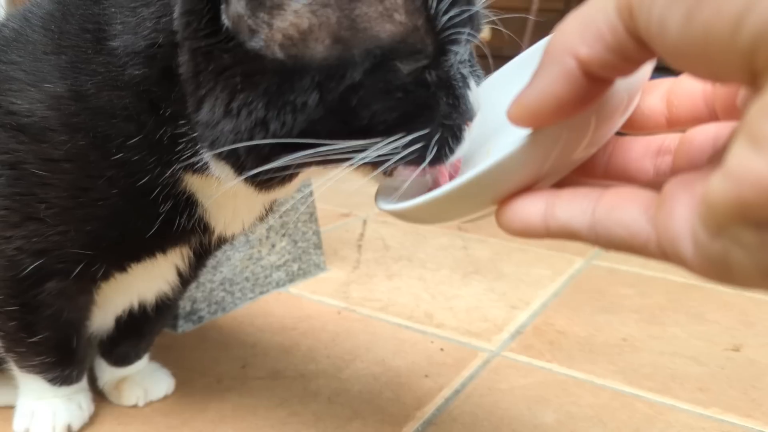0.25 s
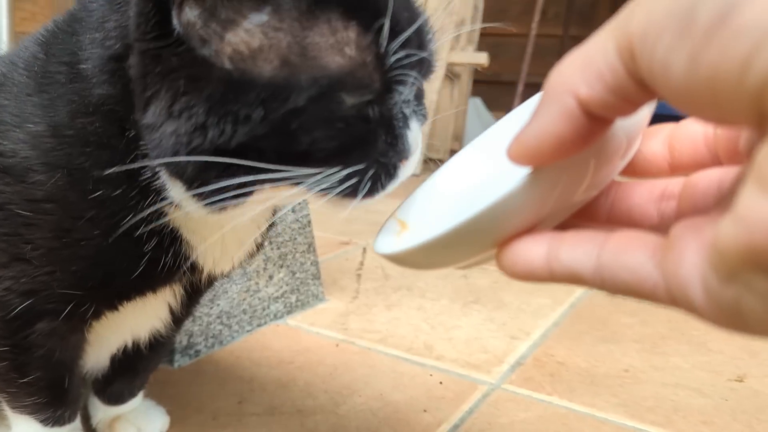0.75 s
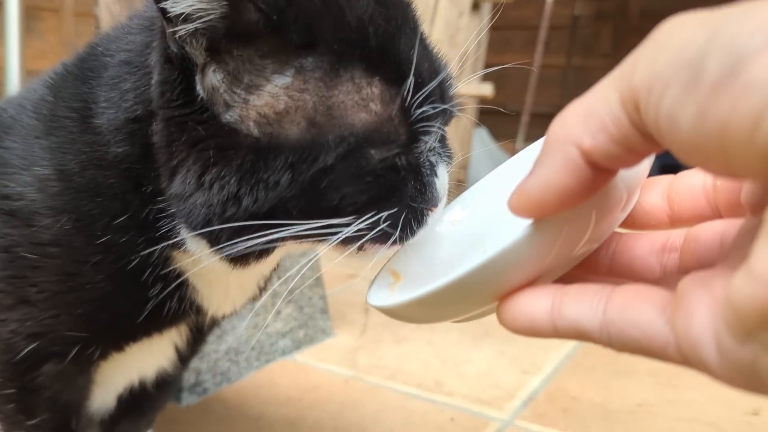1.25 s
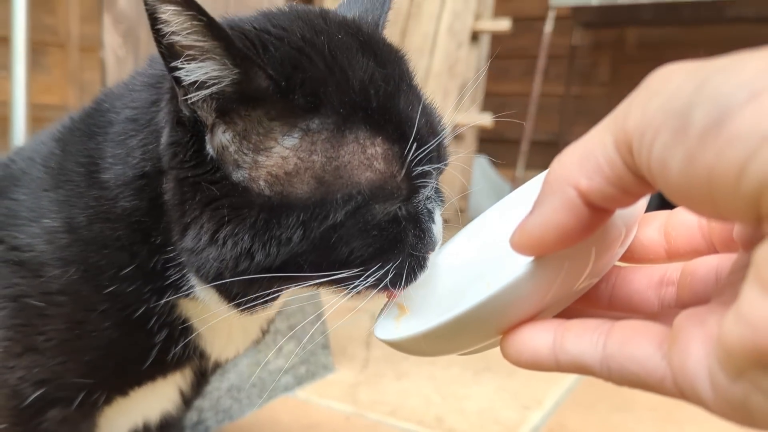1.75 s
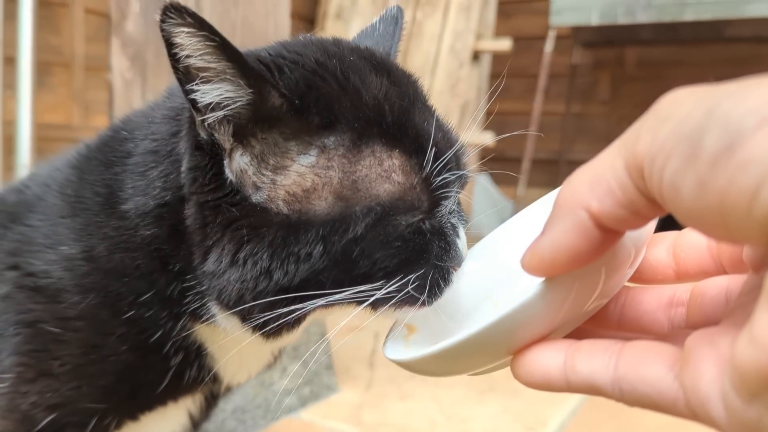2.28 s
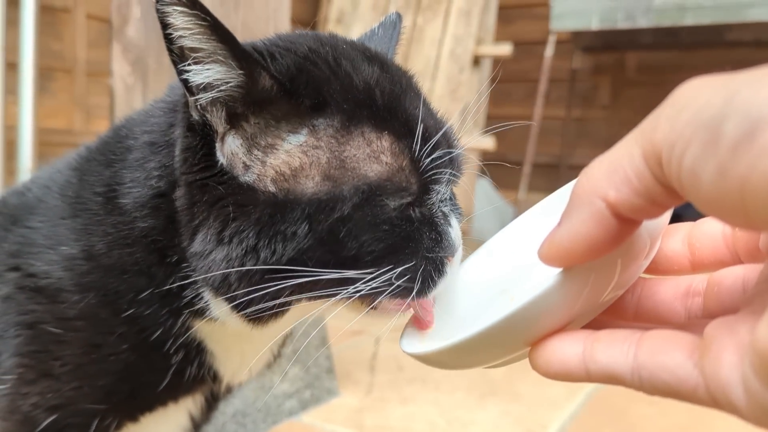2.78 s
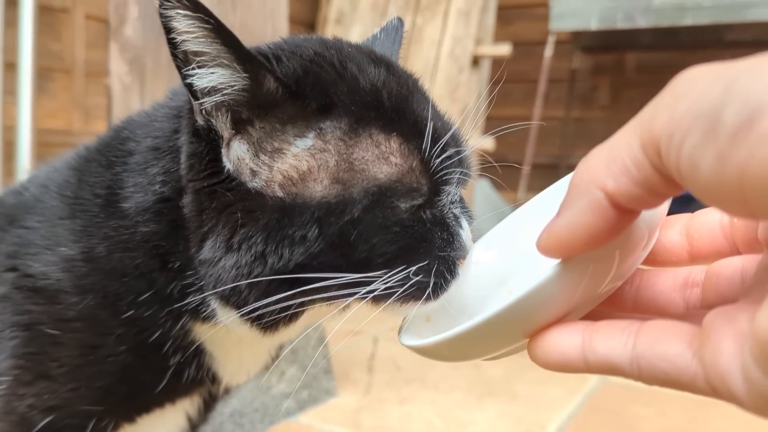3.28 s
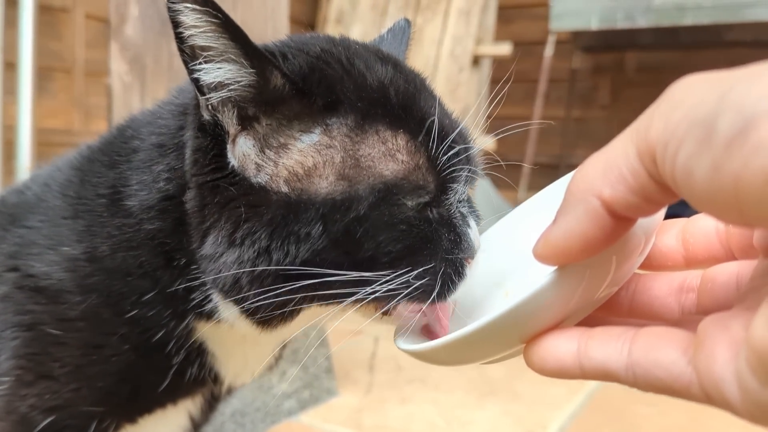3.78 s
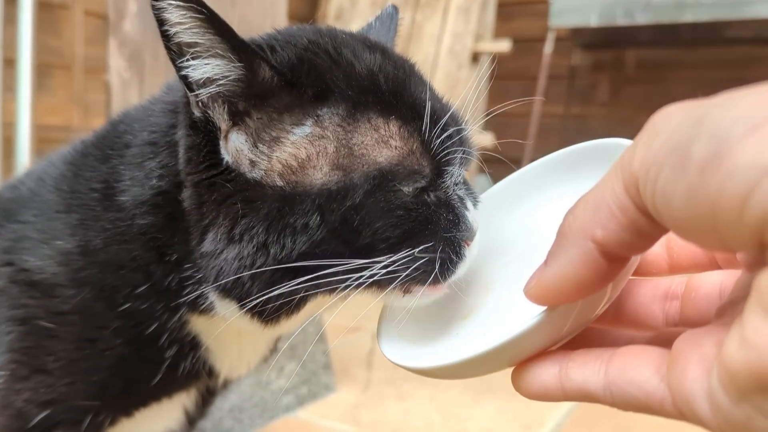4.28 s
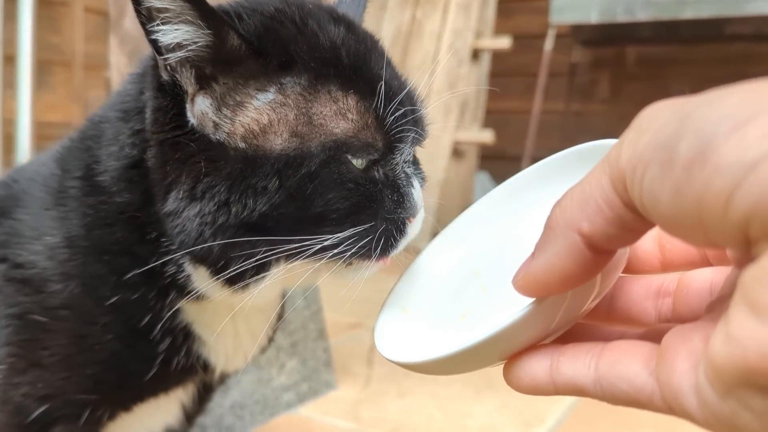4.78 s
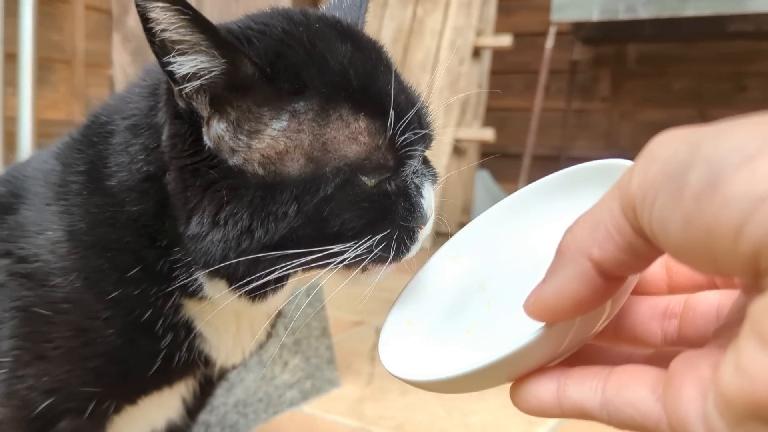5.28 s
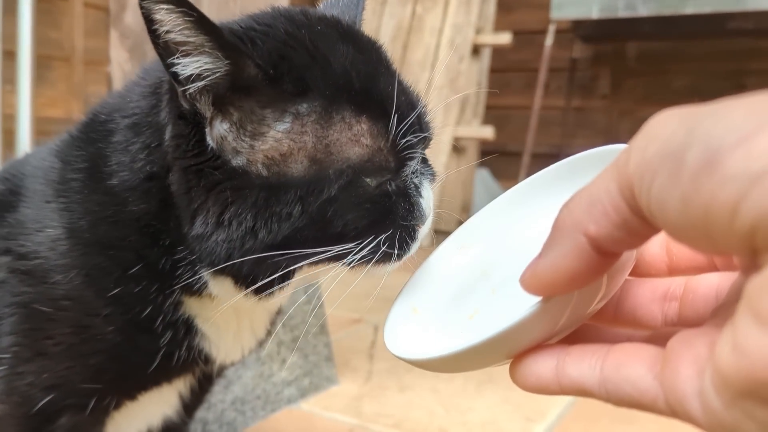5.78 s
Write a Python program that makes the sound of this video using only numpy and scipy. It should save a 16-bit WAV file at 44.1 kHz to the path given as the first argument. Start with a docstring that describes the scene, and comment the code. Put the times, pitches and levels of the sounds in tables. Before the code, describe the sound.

A cat licks paste from a small dish up close, wet smacks about three times a second, with brief bird chirps on a patio.

```python
"""On a patio, close to a phone, a cat licks paste from a small hand-held dish.
About three times a second the wet tongue parts from the palate: a snap rings the mouth, with a spray of fizz.
Between smacks it rasps over the dish in swells of tiny clicks; squelches, lip clicks and bubbles fill in.
Small birds chirp for a moment as gliding, partly hoarse whistles, echoed by the house walls.
Underneath lie coloured noise as a low rumble and a soft hiss, and a sine hum that wavers."""
import sys
import numpy as np
from scipy import signal
from scipy.fft import rfft, irfft, next_fast_len
from scipy.io import wavfile
from scipy.ndimage import uniform_filter1d

SR = 44100
rng = np.random.default_rng(int(sys.argv[2]) if len(sys.argv) > 2 else 0)


def write(x):
    x = np.atleast_2d(x).T
    wavfile.write(sys.argv[1], SR, np.round(np.clip(x, -1, 1) * 32767).astype(np.int16))


N = 266793
T = np.arange(N) / SR

# distant rumble, level before trim: start_s, level_db
RUMBLE_LEVEL = [(0.0, -62.5), (0.5, -69.0), (0.6, -61), (2.58, -63.5), (2.88, -57.5), (3.37, -72),
                (3.67, -61.9), (3.97, -68), (4.17, -59), (4.26, -69), (4.36, -59.5), (4.66, -65),
                (4.86, -57.5), (5.06, -69.5), (5.26, -63), (5.36, -68.5), (5.45, -62), (6.05, -61.5)]
# tone of the rumble: pitch_hz, level_db
RUMBLE_COLOUR = [(25, -30), (45, -19.5), (70, -5), (135, -2), (200, -8), (280, -9), (400, -15),
                 (700, -18.5), (1200, -27), (2500, -37), (6000, -62)]
# tone of the steady open air: pitch_hz, level_db
AIR_COLOUR = [(300, -2), (1500, -3.5), (2700, 1.5), (3400, -5.5), (3950, -1), (4500, -6.5), (6100, -4.5),
              (7700, -10.5), (11700, -8), (15500, -11)]
# tone of the hiss that swells with the birds: pitch_hz, level_db
HISS_COLOUR = [(300, -6), (900, -3.5), (1700, 2), (2600, 2), (4500, -8), (6300, -5.5), (8000, -9),
               (12000, -7), (15500, -13)]
# licks, each a smack and then a stroke, levels before trim: start_s, pop_db, mouth_hz, mouth_q (ratio),
# spray_db, tip_click_db (against the smack), stickiness (0-1), slurp_db, stroke_delay_s, stroke_db
LICKS = [(0.2024, -18, 2530, 1.54, -29, -15, 0.1, -72, 0.19, -57.5),
         (0.5299, -19.5, 3570, 1.7, -29, -24, 0.1, -60, .17, -77),
         (0.8672, 1, 2560, 1.48, -4.5, -11, 0.13, -62, 0.13, -67),
         (1.157, 5, 2320, 0.86, -9.5, -20.5, 0.23, -63.5, .17, -58),
         (1.5015, -6, 2000, 0.96, -9.5, -12.5, 0.17, -65, 0.15, -56),
         (1.8258, 0, 2220, 2.4, -9, -17, 0.4, -54, .157, -54),
         (2.1534, 0.5, 2920, 0.94, -10, -18, 0.17, -55, 0.16, -52.5),
         (2.4783, 3.5, 2550, 2.85, -9.5, -14, 0.32, -53, .16, -51.5),
         (2.8066, -18, 4440, 1.4, -15, -8, 0.6, -51, 0.13, -54.5),
         (3.097, 2.5, 2430, 1.8, -10, -2, 0.23, -56.5, .18, -55.5),
         (3.4529, -1, 2390, 2.54, -3, -15, 0.12, -67, .17, -55),
         (3.7972, -8, 2520, 1.85, -14.5, -17, 0.44, -62.5, 0.16, -55.5),
         (4.1108, 6.5, 4380, 3.9, -16.5, -42, 0.44, -62.5, .204, -51),
         (4.4874, 1.5, 3130, 1.12, -11, -27, 0.58, -60, 0.15, -66),
         (4.8464, 9, 2250, 1.34, -16.5, -32, 0.14, -54, 0.15, -63),
         (5.1854, 13, 2350, 1.4, -6, -20.5, 0.24, -59, 0.17, -53),
         (5.5402, 8, 2820, 1.72, -0.5, -35, .1, -61.5, .205, -55.5),
         (6.0327, -4, 2340, 1, -11, -13.5, .1, -62, .17, -57)]
# lone clicks of the lips between licks, levels before trim: start_s, pop_db, mouth_hz, spray_db
LIP_CLICKS = [(1.3407, -10, 2240, -35), (1.7804, -11, 3640, -9), (2.0247, -6.5, 2200, -25),
              (2.4441, 1.5, 4280, -18.5), (3.0704, -13.5, 4500, -31), (4.791, -36, 3000, -19.5),
              (4.8221, -9, 2320, -20.5), (5.1567, -16.5, 2650, -43), (5.495, -39, 2980, -23),
              (5.897, -42, 2980, -20), (5.9228, -16, 2520, -33.5), (6.0129, -16, 2780, -18)]
# tone of the tongue rasp, before the treble tilt: pitch_hz, level_db
RASP_COLOUR = [(600, -2.5), (1500, -8.5), (2600, 8), (3800, -2), (5600, 7), (7500, -1), (11000, -4),
               (15000, -15)]
# soft squelches in the closed mouth: middle_s, length_s, level_db
SQUELCHES = [(0.597, 0.026, -65.5), (0.867, 0.098, -58), (1.005, 0.03, -57.5), (1.346, .06, -61.5),
             (3.511, .08, -64), (3.683, 0.021, -71), (4.137, 0.069, -72)]
# dull bumps of the hand that holds the dish: start_s, pitch_hz, level_db
BUMPS = [(.59, 152, -48), (1.262, 152, -43.5), (1.275, 108, -57), (4.908, 134, -49), (5.43, 134, -46.5)]
# how the close mouth reaches the two microphone ports: pitch_hz, left_db, right_db
PORTS = [(600, 3, 3.5), (1300, 3.5, 0.5), (1806, 7, 0), (2160, -6, -7), (2513, 5.5, -17.5),
         (2950, -1, -15.5), (3860, 4.5, -14.5), (4220, -6.5, -12.5), (6090, 3, -4), (8230, -20.5, -10),
         (11680, 1.5, -1), (14300, -22.5, -5)]
# kinds of bird note, by name: length_s, start_pitch and end_pitch (ratios of the middle), hoarseness (0-1)
NOTES = {"cheep": (0.0446, 1.13, 1.0, 0.86), "rise": (.042, .83, 1.223, 0.36),
         "fall": (.035, 1.14, .86, 0.52), "buzz": (0.0457, 1.04, .98, 0.58),
         "whistle": (0.0517, 1.015, .99, 0.17)}
# the song, levels before trim: start_s, kind (name of a note), middle_hz, level_db
SONG = [(1.65, "cheep", 4220, -46.5), (1.803, "cheep", 4290, -41.5), (1.895, "rise", 3735, -38.5),
        (1.93, "fall", 3880, -39), (2.029, "whistle", 7200, -49.5), (2.04, "whistle", 5648, -40),
        (2.082, "whistle", 5604, -37.5), (2.108, "fall", 3900, -42), (2.136, "rise", 3850, -39.5),
        (2.158, "buzz", 4590, -46.5), (2.3, "buzz", 7170, -60), (2.657, "buzz", 8580, -59.5),
        (2.775, "whistle", 5450, -45), (2.813, "buzz", 4340, -46), (2.822, "buzz", 4787, -44.5),
        (3.005, "rise", 3540, -60.5), (3.046, "buzz", 2770, -53.5)]
# one repeat of the trill, levels before trim and fade: delay_s, kind (name of a note), middle_hz, level_db
TRILL = [(0, "buzz", 4880, -45), (.025, "fall", 3692, -37.5)]

HUM_HZ, HUM_DB = 119.5, -66.5  # centre of the wavering pitch and level
AIR_DB = -70.5  # before the small left-right offset
# the tip of the tongue lets go just before the smack, with a higher click
TIP_LEAD_S, TIP_PITCH_RATIO = .0095, 1.19
# a sticky tongue comes away in several snaps, each weaker than the last by its stickiness
SNAP_GAP_S = .003
LIP_Q = 2.43
# the stroke drags on for a moment; a shorter slurp trails the smack itself
STROKE_S = .05
SLURP_LAG_S, SLURP_S = .028, .04
# the cat lifts its head and goes on licking its lips, which sounds brighter
LIFTS_HEAD_S = 4.7
DISH_TILT_DB, LIPS_TILT_DB = 1.86, 7.5  # treble of a stroke, dB per octave
DISH_DROPLET_HZ, LIPS_DROPLET_HZ = 10300, 11340  # ring of the finest bubbles
DISH_SPRAY_HZ, LIPS_SPRAY_HZ = 8900, 15000  # upper edge of the spray
# the trill in mid-song fades by this much with each repeat
TRILL_START_S, TRILL_PERIOD_S, TRILL_FADE_DB = 2.37, .072, -2
PATIO_T60_S = .4
TOP_HZ = 15900


def amp(db):
    """Decibels to gain."""
    return 10 ** (np.asarray(db) / 20)


def unit(x):
    """Scale to rms 1."""
    return x / np.sqrt(np.mean(x ** 2) + 1e-20)


def add(track, start_s, x):
    """Mix x into the track at start_s."""
    i = max(int(start_s * SR), 0)
    track[i:i + len(x)] += x[:max(N - i, 0)]


def band(x, lo_hz, hi_hz, order=2):
    """Butterworth band-pass for a short sound, applied to its spectrum."""
    size = next_fast_len(len(x), True)
    s = 2j * np.pi * np.fft.rfftfreq(size, 1 / SR)[:, None]
    poles = signal.buttap(order)[1]
    low_pass = 1 / (s / (2 * np.pi * hi_hz) - poles)
    high_pass = s / (s - 2 * np.pi * lo_hz * poles)
    response = np.prod(low_pass * high_pass, axis=1)
    return irfft(rfft(x, size) * response, size)[:len(x)]


def gains(points, size):
    """Gain at each FFT bin from (pitch_hz, level_db) points, joined on a log pitch scale."""
    hz, db = np.transpose(points)
    bins_hz = np.fft.rfftfreq(size, 1 / SR)
    return amp(np.interp(np.log(bins_hz + 1), np.log(hz), db))


def colour(x, points, size=1024):
    """Causal minimum-phase filter with the given (pitch_hz, level_db) response."""
    cepstrum = irfft(np.log(gains(points, size)))
    # fold the cepstrum forward in time so that nothing rings ahead of a click
    cepstrum[1:size // 2] *= 2
    cepstrum[size // 2 + 1:] = 0
    impulse = irfft(np.exp(rfft(cepstrum)))
    return signal.oaconvolve(x, impulse)[:len(x)]


def resonate(x, hz, q):
    """One resonance with gain 1 at its centre."""
    w = 2 * np.pi * hz / SR
    a = np.sin(w) / (2 * q)
    return signal.lfilter([a, 0, -a], [1 + a, -2 * np.cos(w), 1 - a], x)


def walk(rate):
    """Smooth random wander with rms 1, drawn rate times a second."""
    k = int(SR / rate)
    steps = np.repeat(rng.standard_normal(N // k + 1), k)
    smooth = uniform_filter1d(uniform_filter1d(steps, k), k)
    return unit(smooth[:N])


def crackle(size, spread_db):
    """Dense tiny clicks of very unequal strength, rms 1."""
    strength_db = spread_db * np.minimum(rng.exponential(size=size), 6)
    return unit(rng.standard_normal(size) * amp(strength_db))


def swell(length_s):
    """A smooth rise and fall."""
    return np.hanning(int(length_s * SR))


def echoes(x, t60_s, delay_s):
    """Diffuse reflections: a decaying noise tail of unit energy that begins after a delay."""
    t = T[:SR // 2]
    tail = rng.standard_normal(len(t)) * 1000 ** (-t / t60_s) * (t > delay_s)
    return signal.oaconvolve(x, tail / np.linalg.norm(tail))[:N]


def stereo_noise(points, wide_hz=650):
    """Coloured noise at the two ports, rms 1: alike in the bass, mostly unrelated in the treble."""
    size = next_fast_len(N, True)
    mid, side = rfft(rng.standard_normal((2, size))) * gains(points, size)
    side = side * np.clip(np.fft.rfftfreq(size, 1 / SR) / wide_hz, .3, .9)
    return unit(irfft(np.array([mid + side, mid - side]), size)[:, :N])


def rumble(level_db=-1.0, flicker_db=2.5, lick_db=2, lick_lag_s=0.029, lick_s=0.12):
    """A distant rumble of noise with a wavering sine hum in it; both swell slowly, and a little with every lick."""
    licking = np.zeros(N)
    for start_s, *_ in LICKS:
        add(licking, start_s + lick_lag_s - lick_s / 2, swell(lick_s))
    db = np.interp(T, *np.transpose(RUMBLE_LEVEL)) + lick_db * licking
    hum_hz = HUM_HZ + 0.77 * walk(4.04)
    hum_db = HUM_DB + 2.7 * walk(10) + db - db.mean()
    hum = np.sin(2 * np.pi * np.cumsum(hum_hz) / SR) * amp(hum_db)
    return stereo_noise(RUMBLE_COLOUR) * amp(db + level_db + flicker_db * walk(45)) + hum


def hiss(song, surge_db=-57, follow=0.52, smooth_s=0.094, left_db=0.5, flicker_db=1.5):
    """Faint steady air, and a broad soft hiss that swells with the smoothed loudness of the birds."""
    loudness = np.sqrt(abs(uniform_filter1d(song[0] ** 2, int(smooth_s * SR))))
    surge_gain = (loudness / loudness.max()) ** follow * amp(surge_db + flicker_db * walk(30.1))
    surge = stereo_noise(HISS_COLOUR) * surge_gain
    air = amp(AIR_DB) * stereo_noise(AIR_COLOUR)
    return (surge + air) * amp([[left_db], [-left_db]])


def smack(db, hz, q, wet_db, lead_s, droplet_hz, spray_top_hz, pop_db=1, spray_db=-1,
          spray_s=0.0027, spray_rise_s=0.00089, peel_db=-19, peel_s=0.006, softness=1.64, droplet_db=-3):
    """The saliva film peels with a rising crackle, then snaps: the mouth rings and droplets fizz."""
    t = T[:SR // 25] - lead_s  # the snap falls at t = 0
    peel = crackle(len(t), 2.6) * np.exp(-abs(t) / peel_s)
    push = amp(peel_db) * peel / np.linalg.norm(peel)
    push[np.argmin(abs(t))] += 1
    # soft tissue lets go slowly, so little is left an octave above the resonance
    ring = resonate(resonate(push, hz, q), hz, q)
    pop = band(ring, 120, softness * hz, order=7)
    spray = crackle(len(t), 0.89) * np.exp(np.minimum(t / spray_rise_s, -t / spray_s))
    spray = band(spray / np.linalg.norm(spray), 4050, spray_top_hz)
    # the finest bubbles ring briefly, very high
    spray = 0.89 * spray + amp(droplet_db) * resonate(spray, droplet_hz, 15.4)
    return amp(db + pop_db) * pop + amp(wet_db + spray_db) * spray


def smacks(lead_s=0.011):
    """The tip of the tongue clicks, then the rest comes away in quick snaps; the lips click in between."""
    out = np.zeros(N)
    snaps = [(start_s, db, hz, LIP_Q, wet_db, 1) for start_s, db, hz, wet_db in LIP_CLICKS]
    for start_s, db, hz, q, wet_db, tip_db, sticky, *_ in LICKS:
        snaps += [(start_s - TIP_LEAD_S, db, hz * TIP_PITCH_RATIO, q, wet_db, amp(tip_db))]
        snaps += [(start_s + k * SNAP_GAP_S, db, hz, q, wet_db, sticky ** k) for k in range(4)]
    for start_s, db, hz, q, wet_db, strength in snaps:
        on_dish = start_s < LIFTS_HEAD_S
        droplet_hz = DISH_DROPLET_HZ if on_dish else LIPS_DROPLET_HZ
        spray_top_hz = DISH_SPRAY_HZ if on_dish else LIPS_SPRAY_HZ
        add(out, start_s - lead_s, strength * smack(db, hz, q, wet_db, lead_s, droplet_hz, spray_top_hz))
    return out


def strokes(level_db=3, grain_db=2.0, pivot_hz=5000):
    """Barbs of the tongue drag through the paste, each one a tiny click."""
    out = np.zeros(N)
    for start_s, *_, slurp_db, stroke_delay_s, stroke_db in LICKS:
        tilt_db = DISH_TILT_DB if start_s < LIFTS_HEAD_S else LIPS_TILT_DB
        tone = [(hz, db + tilt_db * np.log2(hz / pivot_hz)) for hz, db in RASP_COLOUR]
        drags = (SLURP_LAG_S, SLURP_S, slurp_db), (stroke_delay_s, STROKE_S, stroke_db)
        for delay_s, length_s, drag_db in drags:
            press = swell(length_s)
            rasp = unit(colour(crackle(len(press), grain_db), tone))
            add(out, start_s + delay_s - length_s / 2, amp(drag_db + level_db) * press * rasp)
    return out


def saliva(count=45, level_db=-35, spread_db=4):
    """Stray little bubbles burst on the lips and in the paste, each a briefly ringing tick."""
    out = np.zeros(N)
    for when, pitch, strength in rng.random((count, 3)):
        tick = resonate(signal.unit_impulse(256), 2000 * 2 ** (2 * pitch), 3)
        add(out, when * N / SR, amp(level_db + spread_db * 2 * strength) * tick)
    return out


def soft_sounds(squelch_hz=600, squelch_q=0.86, bump_s=0.0037):
    """Squelches muffled by closed lips (low resonances) and quickly damped sine bumps of the hand."""
    out, t = np.zeros(N), T[:SR // 10]
    for middle_s, length_s, db in SQUELCHES:
        press = swell(length_s)
        muffled = resonate(crackle(len(press), 5), squelch_hz, squelch_q)
        muffled = resonate(muffled, squelch_hz, squelch_q)
        add(out, middle_s - length_s / 2, amp(db) * press * unit(muffled))
    for start_s, hz, db in BUMPS:
        thump = t / bump_s * np.exp(1 - t / bump_s)
        add(out, start_s, amp(db) * np.sin(2 * np.pi * hz * t) * thump)
    return out


def chirps():
    """All notes of the song and its three-fold trill as (start_s, kind, middle_hz, level_db)."""
    return SONG + [(TRILL_START_S + k * TRILL_PERIOD_S + delay_s, kind, hz, db + k * TRILL_FADE_DB)
                   for k in range(3) for delay_s, kind, hz, db in TRILL]


def birds(waver=0.018, rasp_share=1.3, direct_db=3.5, near_db=1.0, near_t60_s=0.2,
          wall_db=-0.5, right_db=-8, wall_t60_s=0.37):
    """Whistles that glide through three pitches, some of them hoarse; the walls smear them."""
    out, wobble, flutter, rasp = np.zeros(N), walk(500), walk(250), walk(1700)
    for start_s, kind, middle_hz, db in chirps():
        length_s, start, end, hoarse = NOTES[kind]
        effort = np.sqrt(swell(length_s))
        here = int(start_s * SR) + np.arange(len(effort))
        curve = np.polyfit([0, .5, 1], [start, 1, end], 2)
        glide = middle_hz * np.polyval(curve, np.linspace(0, 1, len(effort)))
        hz = glide * (1 + waver * hoarse * wobble[here])
        # an unsteady membrane spreads the whistle into a band
        voice = unit(amp(2 * flutter[here]) + rasp_share * hoarse * rasp[here])
        add(out, start_s, amp(db) * effort * voice * np.sin(2 * np.pi * np.cumsum(hz) / SR))
    # each port hears its own random reflections
    left, right = (amp(direct_db) * out + amp(near_db) * echoes(out, near_t60_s, 0.0023)
                   + amp(wall_db) * echoes(out, wall_t60_s, .012) for _ in range(2))
    return np.array([left, amp(right_db) * right])


def scene(near_db=-19, near_t60_s=0.036, patio_db=-26, dish_s=0.000672, dish_db=-16, port_lag_s=.00021):
    """The close mouth, with reflections from the dish, the floor tiles and the walls; birds and background."""
    mouth = smacks() + strokes() + saliva()
    # the dish returns one faint delayed copy
    mouth = mouth + amp(dish_db) * np.interp(T - dish_s, T, mouth)
    left, right = (colour(mouth, np.array(PORTS)[:, [0, port]]) for port in (1, 2))
    # the sound reaches the right port first
    direct = np.array([np.roll(left, int(port_lag_s * SR)), right])
    # reflections come from all round, so both ports hear them with the same tone
    around = (left + right) / 2
    room = np.array([amp(near_db) * echoes(around, near_t60_s, 0.0099)
                     + amp(patio_db) * echoes(around, PATIO_T60_S, 0.0021) for _ in range(2)])
    song = birds()
    return direct + room + soft_sounds() + song + rumble() + hiss(song)


def record(dry):
    """The phone cuts the top of the treble with a steep low-pass."""
    return signal.sosfilt(signal.ellip(8, .2, 70, TOP_HZ, fs=SR, output="sos"), dry)


dry = scene()
out = record(dry)
write(out)
```